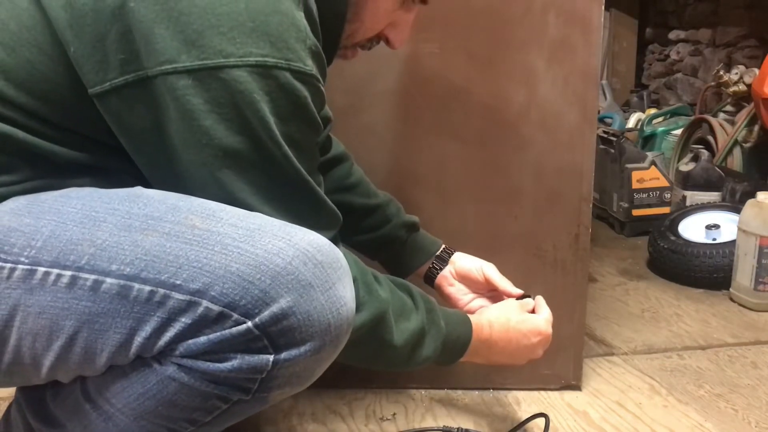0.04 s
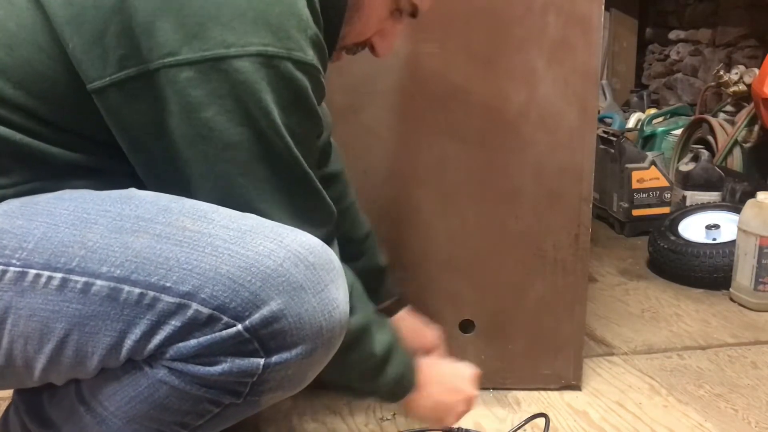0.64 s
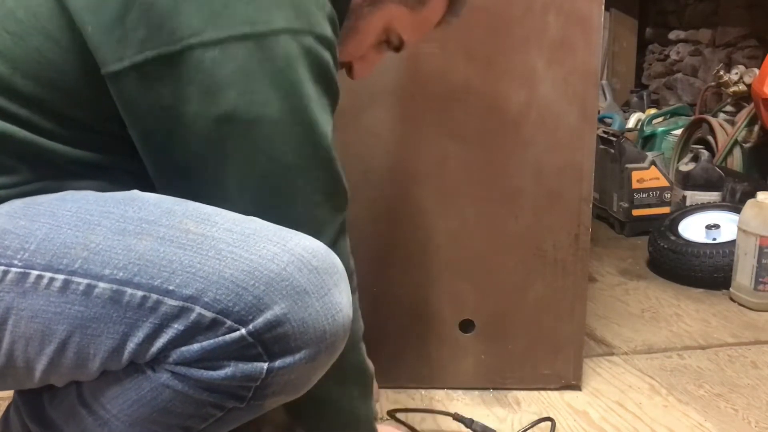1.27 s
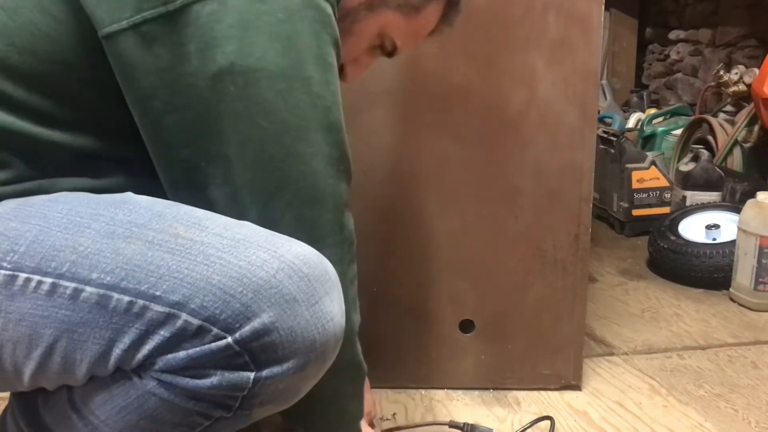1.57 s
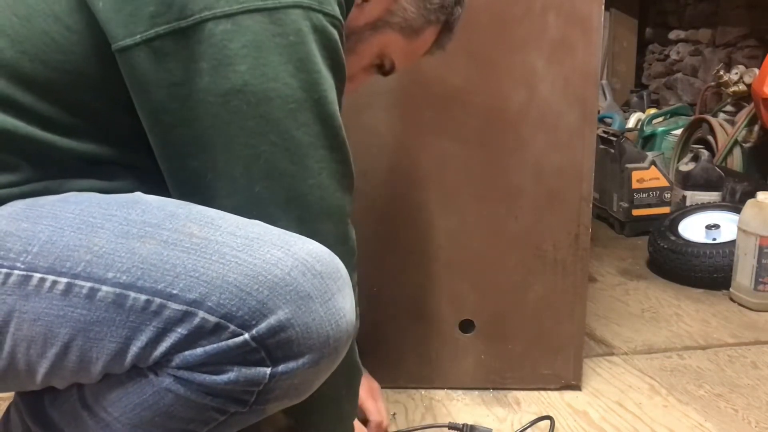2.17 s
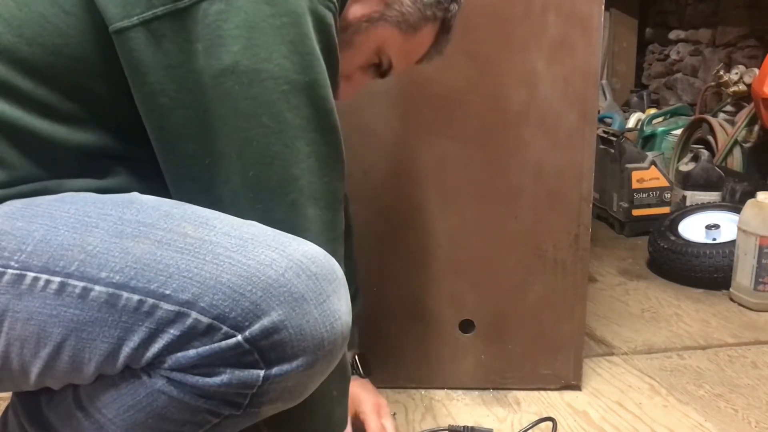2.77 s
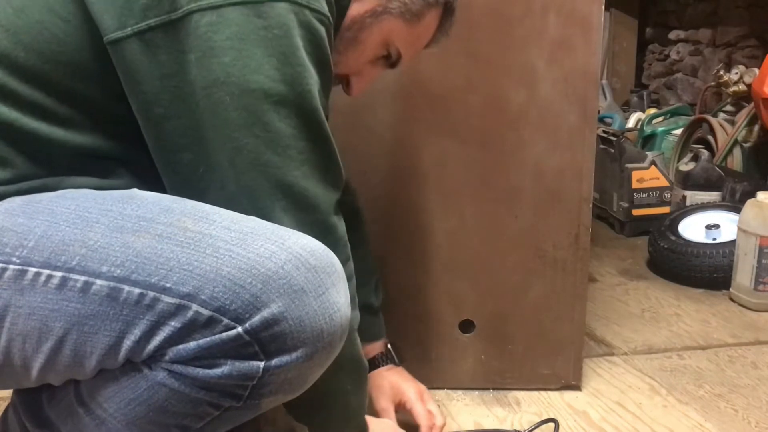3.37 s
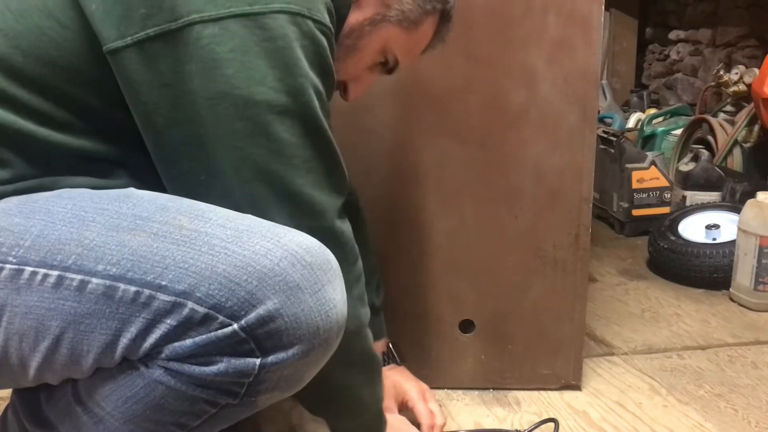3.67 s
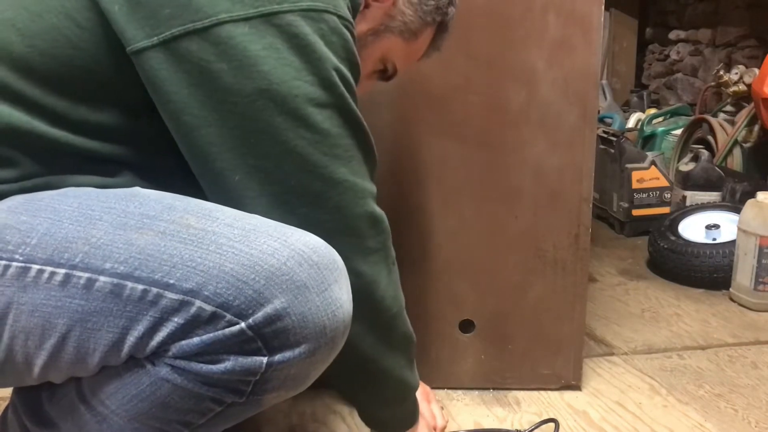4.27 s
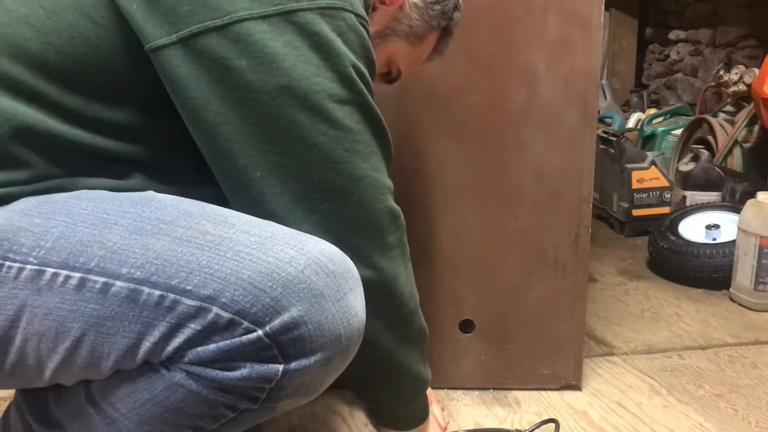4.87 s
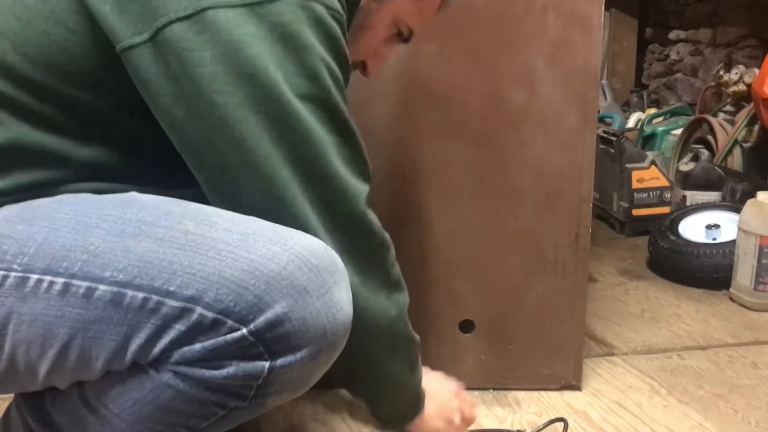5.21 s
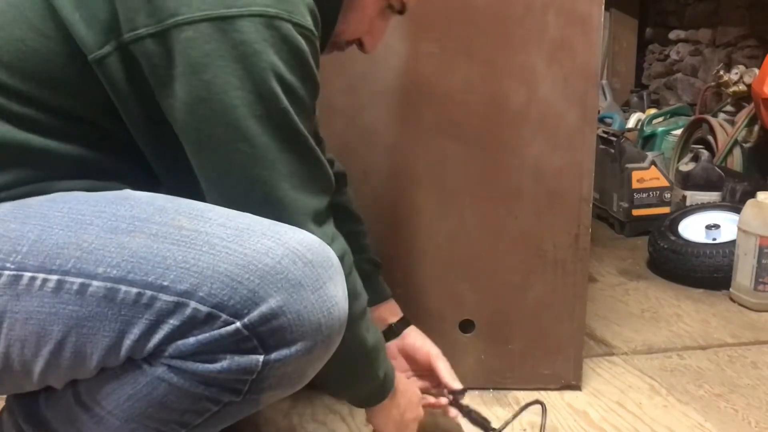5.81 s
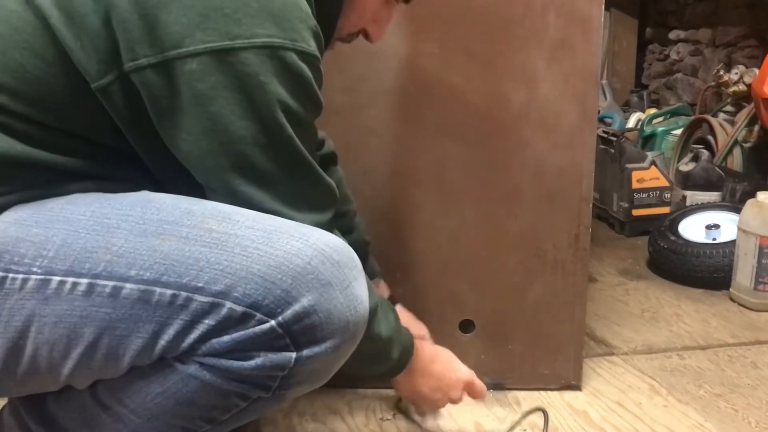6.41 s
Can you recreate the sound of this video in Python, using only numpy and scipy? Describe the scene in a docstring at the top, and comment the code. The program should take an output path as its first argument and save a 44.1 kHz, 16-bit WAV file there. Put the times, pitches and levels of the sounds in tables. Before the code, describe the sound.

A steel hand tool clinks and later scrapes across the floor, amid close rubber rubbing, cord knocks and sleeve rustle.

```python
"""Dull rubbing and soft bumps on the floor, then the clink of a steel hand tool being picked up.
One close microphone in a small workshop, where someone kneels by a steel cabinet and works a rubber
grommet on to a power cord. The rubber sticks and slips, the tool is shoved aside with a gritty,
ringing scrape, and the cord is lifted with a few soft knocks. Sleeves rustle over a low room rumble."""
import sys
import numpy as np
from scipy import signal
from scipy.fft import rfft, irfft
from scipy.io import wavfile
from scipy.ndimage import uniform_filter1d

SR = 44100
rng = np.random.default_rng(int(sys.argv[2]) if len(sys.argv) > 2 else 0)


def unload_audio(sound):
    """Save the sound as a 16-bit wav file, at the path given as the first command line argument."""
    columns = np.transpose(np.atleast_2d(sound))
    # keep every value between -1 and 1, then stretch to whole-number steps
    steps = np.round(np.clip(columns, -1, 1) * 32767)
    wavfile.write(sys.argv[1], SR, steps.astype(np.int16))


N = 284445
TIME = np.arange(N) / SR
AGE = np.arange(SR // 3) / SR  # seconds since a contact


# Steel touches steel, close by: start_s, relative_db, pitch_hz, swell_s, fall_s, focus_db
STEEL_TOUCHES = [(1.1177, -27, 6100, 0.0006, 0.0026, 6.5), (1.12, -14.5, 8400, 0.003, 0.0024, 8),
                 (1.2124, -21.5, 1930, 0.0057, 0.0018, 4), (1.2366, -19.5, 4670, 0.0013, 0.0065, -19),
                 (1.2500, -33, 4840, .001, 0.0057, -9), (1.2602, -16, 7460, 0.0012, 0.0043, -6),
                 (1.268, -24.5, 4400, .001, 0.022, -16), (1.303, -26, 4500, .001, 0.0021, -3),
                 (1.3086, -21, 4330, .0005, 0.0014, 18), (1.589, -23.5, 5000, 0.0068, 0.0048, -19.5)]
# Spectrum of a hard contact: frequency_hz, level_db
CRACK_SPECTRUM = [(400, -15), (1050, -0.5), (1400, -9.5), (1900, -5.5), (2800, -5), (4500, -2), (8000, 2.5),
                  (10200, -6.5), (12500, 1.5), (16000, -10)]
def clinks():
    """Each touch is a short crack, focused round one pitch, and the ring of the steel."""
    out = np.zeros(N)
    for start_s, db, pitch_hz, swell_s, fall_s, focus_db in STEEL_TOUCHES:
        crack = colour(burst(swell_s, fall_s), CRACK_SPECTRUM)
        focus = unit(resonance(crack, pitch_hz, width_hz=900))
        clash = unit(unit(crack) + from_db(focus_db) * focus)
        ring = from_db(-4) * tool_ring(pitch_hz, reach_octaves=0.073)
        add(out, start_s, from_db(db + 13.5) * (clash + ring))
    return out


# Modes of the steel tool: pitch_hz, level_db, t60_s
TOOL_MODES = [(1095, -4, 0.14), (1786, -13, .08), (3000, -17, .05), (4445, 6.5, 0.082), (4620, 1.5, 0.11),
              (5750, -16.5, 0.09), (6060, -5.5, 0.07), (6460, 6, 0.0755), (7280, -3, .06),
              (8220, 6.5, 0.065), (11390, -4, .05), (12500, -14.5, 0.074), (13340, -20.5, .06)]
def tool_ring(pitch_hz, reach_octaves):
    """The modes ring, roughened by the chattering contact; those near pitch_hz are struck hardest."""
    out = 0
    for hz, db, t60_s in TOOL_MODES:
        noise = rng.standard_normal(2 * len(AGE))
        chatter = rms_one(resonance(noise, hz, width_hz=76)[len(AGE):])
        tone = np.sin(2 * np.pi * (hz * AGE + rng.random())) + 0.7 * chatter
        struck = 0.064 + 1 / (1 + (np.log2(hz / pitch_hz) / reach_octaves) ** 2)
        out = out + struck * tone * from_db(db - 60 * AGE / t60_s)
    return unit(out)


def pop(start_s, db, pitch_hz, ring_s):
    """A small hollow pop, one damped tone, starts the last clink."""
    out = np.zeros(N)
    envelope = np.exp(-AGE / ring_s) * (1 - np.exp(-AGE / 0.0012))
    add(out, start_s, from_db(db) * envelope * np.sin(2 * np.pi * pitch_hz * AGE))
    return out


# The tool catches and slips on the floor, levels relative: start_s, crunch_db, fall_s, thump_db
TOOL_SLIPS = [(4.975, -34.5, 0.04, -30.5), (4.9908, -33.5, 0.0098, -33), (5.02, -30, .0046, -19),
              (5.0603, -22, 0.011, -24), (5.0893, -22.5, 0.013, -19), (5.108, -35, .0051, -26),
              (5.1305, -32.5, 0.0057, -19.5), (5.1513, -25.5, 0.0089, -42), (5.176, -34, 0.011, -39),
              (5.204, -36, 0.016, -25), (5.235, -29, 0.0088, -19), (5.247, -33, 0.003, -26.5),
              (5.3088, -29.5, 0.0066, -18.5), (5.3626, -33.5, .024, -16.5), (5.3858, -32.5, 0.0038, -25),
              (5.4246, -35.5, 0.0097, -31)]
# Spectra of the juddering tool and of the grit under it: frequency_hz, level_db
JUDDER_SPECTRUM = [(30, -41.5), (85, 4), (140, 5), (220, 1.5), (400, 0), (720, -1.5), (850, -11.5),
                   (1050, -10), (1300, -21.5), (3000, -49), (10000, -77)]
GRIT_SPECTRUM = [(500, -14), (1300, -8), (1800, 2.5), (2800, 2), (3400, 8), (5300, 2), (6400, 10.5),
                 (7200, 5), (8600, 7.5), (10300, -4), (11800, 4), (13500, 8), (16000, -5)]
def shove():
    """The sliding tool judders on the floor, crunches over grit and rings at every slip."""
    judder, grit = stick_and_slip(start_s=4.97, end_s=5.41)
    slide = judder * friction(per_s=220, spread_db=7)
    floor = from_db(-3) * unit(hollow(slide))
    scrape = from_db(-3.5) * unit(colour(slide, JUDDER_SPECTRUM))
    body = np.linalg.norm(slide) * (floor + scrape)
    grains = friction(per_s=530, spread_db=1.5)
    hiss = from_db(-6.5) * rms_one(colour(grains, GRIT_SPECTRUM))
    singing = sum(from_db(db / 2) * resonance(grains, hz, width_hz=180) for hz, db, _ in TOOL_MODES)
    out = body + grit * (hiss + from_db(-9) * rms_one(singing))
    for start_s, crunch_db, fall_s, thump_db in TOOL_SLIPS:
        add(out, start_s, thud(thump_db, low_hz=225, high_hz=692))
        # every slip catches other grains, so its colour differs
        tint = [(hz, db + rng.normal(0, 1.6)) for hz, db in GRIT_SPECTRUM]
        crushed = crackle(spread_db=3) * burst(swell_s=0.0019, fall_s=fall_s)
        crunch = unit(colour(crushed, tint))
        ring = from_db(-10.5) * tool_ring(3500, reach_octaves=0.65)
        add(out, start_s, from_db(crunch_db + 19) * (crunch + ring))
    return out


def stick_and_slip(start_s, end_s):
    """Strength of judder and grit: an easing push that sticks before each slip and trails grit after."""
    attack_s, release_s, sag_db_per_s = 0.0075, 0.041, 20
    stick_s, stick_db = 0.021, -1.5
    trail_s, trail_db = 0.093, -21.5
    age = np.maximum(TIME - start_s, 0)
    push = np.minimum(age / attack_s, 1) * np.exp(-np.maximum(TIME - end_s, 0) / release_s)
    stuck, grit_power = np.zeros(N), np.zeros(N)
    for slip_s, crunch_db, _, _ in TOOL_SLIPS:
        stuck[(TIME > slip_s - stick_s) & (TIME < slip_s)] = 1
        add(grit_power, slip_s, (from_db(crunch_db + trail_db) * np.exp(-AGE / trail_s)) ** 2)
    moving = from_db(stick_db * uniform_filter1d(stuck, size=220))
    judder = moving * push * from_db(-31.5 - sag_db_per_s * age)
    return judder, moving * np.sqrt(grit_power)


def crackle(spread_db, size=40):
    """Uneven strength of single grains as they are crushed, about a millisecond each."""
    grain_db = spread_db * np.clip(rng.standard_normal(len(AGE) // size + 1), -2, 2)
    return np.repeat(from_db(grain_db), size)[:len(AGE)]


# Soft knocks at floor level: start_s, relative_db, low_hz, high_hz
FLOOR_KNOCKS = [(.877, -37.5, 190, 278), (.907, -39.5, 170, 1230), (.972, -39, 250, 1330),
                (1.047, -30.5, 121, 814), (1.21, -34.5, 99, 450), (1.397, -28.5, 200, 420),
                (1.4287, -31, 319, 1520), (1.626, -35.5, 200, 357), (2.241, -34.5, 139, 920),
                (2.900, -29, 214, 466), (3.171, -37, 280, 880), (4.4113, -43.5, 403, 2160),
                (4.413, -39.5, 90, 340), (4.975, -36, 55, 221), (5.061, -22.5, 800, 2520),
                (5.129, -28.5, 1010, 1880), (5.362, -29.5, 600, 1520), (5.722, -35.5, 343, 1140),
                (5.795, -31, 435, 870), (5.982, -32, 109, 855), (6.127, -41.5, 400, 1940),
                (6.187, -41, 414, 1950), (6.35, -44.5, 404, 1600), (6.39, -37, 70, 746),
                (6.4271, -26.5, 505, 1480), (6.428, -26.5, 74, 251)]
def knocks():
    """Hands, cord and plug bump the floor."""
    out = np.zeros(N)
    for start_s, db, low_hz, high_hz in FLOOR_KNOCKS:
        add(out, start_s, thud(db, low_hz, high_hz))
    return out


def thud(db, low_hz, high_hz):
    """A push and a short shudder of the floor; softer contacts lose more treble."""
    push = signal.unit_impulse(len(AGE)) + 1.86 * burst(swell_s=0.002, fall_s=0.005)
    softness = signal.butter(2, 1.46 * high_hz, fs=SR, output="sos")
    hit = unit(signal.sosfilt(softness, band(push, low_hz, high_hz)))
    return from_db(db + 15) * (hit + from_db(-6) * unit(hollow(hit)))


# The floor and the cabinet beside the work: pitch_hz, width_hz, level_db
HOLLOW_MODES = [(88.5, 12, 17), (172, 40, -3), (231, 16.3, 4), (314, 33, -16), (375.7, 17, 5.5),
                (435.5, 25, -5.5), (579, 46, 0), (636, 37, -13), (740, 16, -4.5), (993, 28.4, -4.5)]
def hollow(x):
    """The low resonances of the floor and cabinet answer a contact, in parallel."""
    return sum(from_db(db) * resonance(x, hz, width_hz) for hz, width_hz, db in HOLLOW_MODES)


# Rubber pushed along the cord and floor: peak_s, rub_db, scuff_db, swell_s, fall_s
RUBBER_PUSHES = [(.66, -68, -72.5, .2, 0.53), (1.0, -48.5, -58, 0.028, 0.033),
                 (1.062, -37.5, -53.5, 0.023, 0.063), (1.47, -61, -79, 0.09, 0.18),
                 (1.85, -66.5, -80, .15, .15), (2.135, -58, -60.5, 0.061, 0.085),
                 (2.31, -60, -69.5, 0.16, 0.39), (2.52, -56.5, -68, 0.037, 0.087),
                 (2.908, -36.5, -56, 0.03, 0.061), (3.01, -50, -68, 0.034, 0.12),
                 (3.19, -44, -62.5, 0.066, 0.061), (3.29, -40.5, -60, 0.042, 0.054),
                 (5.495, -43, -57, 0.042, 0.09), (5.625, -39, -53, 0.035, 0.088),
                 (5.89, -47, -72, 0.057, 0.027), (5.942, -47, -64.5, .02, 0.077),
                 (6.2, -52.5, -62, 0.054, 0.043), (6.43, -50, -62, 0.065, .08)]
# Spectrum of the dull rubbing: frequency_hz, level_db
RUBBER_SPECTRUM = [(45, -23.5), (90, -1), (140, 2.5), (250, 0.5), (360, 0.5), (480, -5.5), (680, -4),
                   (850, -17.5), (1050, -17.5), (1400, -22.5), (2200, -32.5), (8000, -54.5)]
def rubber():
    """Rubber sticks and slips in dull lumps that stir the floor and cabinet."""
    pressure = strokes([(s, db, swell_s, fall_s) for s, db, _, swell_s, fall_s in RUBBER_PUSHES])
    lumps = rms_one(colour(friction(per_s=260, spread_db=3.5), RUBBER_SPECTRUM))
    return pressure * rms_one(lumps + from_db(-10.5) * rms_one(hollow(lumps)))


# Small dry ticks of the cord and plug: start_s, relative_db, pitch_hz
PLUG_TICKS = [(1.53, -46, 3850), (2.17, -44, 2980), (2.349, -39.5, 3580), (2.709, -47.5, 3570),
              (2.926, -37, 3420), (4.404, -47.5, 4460), (4.412, -41, 4300), (4.646, -55, 4280),
              (4.802, -49, 4600), (4.802, -47.5, 1650), (4.893, -33.5, 5340), (5.533, -43, 5070),
              (5.722, -43, 5540), (6.075, -49, 6300)]
def ticks():
    """Hard plastic touches: one broad band and a faint bright crack."""
    out = np.zeros(N)
    for start_s, db, pitch_hz in PLUG_TICKS:
        touch = burst(swell_s=0.00033, fall_s=0.0023)
        body = unit(band(touch, pitch_hz / 1.2, pitch_hz * 1.2))
        crack = from_db(-7.5) * unit(colour(touch, CRACK_SPECTRUM))
        add(out, start_s, from_db(db + 7) * (body + crack))
    return out


# Spectrum of the scuffing cord: frequency_hz, level_db
CORD_SPECTRUM = [(400, -20), (900, 4.5), (1400, -2), (2100, -2), (2400, -2), (2750, -3), (3600, -2.5),
                 (5000, -12.5), (9000, -19)]
def cord_scuff():
    """The cord scuffs with each push of the rubber and each move of an arm."""
    pushes = strokes([(s, db, swell_s, fall_s) for s, _, db, swell_s, fall_s in RUBBER_PUSHES])
    arms = from_db(-3) * strokes(ARM_MOVES)
    scuff = rms_one(colour(friction(per_s=340, spread_db=3), CORD_SPECTRUM))
    return np.hypot(pushes, arms) * scuff


# A sleeve brushes past near the microphone: peak_s, level_db, swell_s, fall_s
ARM_MOVES = [(.75, -74, .17, 0.21), (.92, -64, .012, 0.021), (1.0, -58, 0.018, 0.015),
             (1.09, -54.5, 0.07, 0.2), (1.35, -57, .05, 0.09), (1.52, -67, 0.06, 0.13),
             (1.76, -71, 0.18, .04), (1.93, -67.5, 0.075, 0.065), (2.125, -59, 0.053, 0.04),
             (2.255, -64.5, 0.064, 0.043), (2.47, -70.5, 0.14, 0.15), (2.61, -68.5, 0.1, 0.19),
             (2.885, -59, 0.038, 0.075), (3.1, -63.5, 0.053, 0.053), (3.28, -66.5, 0.13, 0.11),
             (5.48, -76.5, 0.08, 0.091), (5.64, -60, 0.12, 0.043), (5.95, -65.5, 0.4, 0.25),
             (6.23, -69.5, 0.086, 0.074), (6.44, -63.5, 0.08, 0.081)]
# Spectrum of the cloth: frequency_hz, level_db
CLOTH_SPECTRUM = [(1000, -23), (2500, -18), (4000, 0), (6000, 3), (8500, 1.5), (10400, -2), (13000, 1),
                  (16000, -3.5)]
def sleeves():
    """Cloth brushes finely over cloth as an arm moves."""
    return strokes(ARM_MOVES) * rms_one(colour(friction(per_s=800, spread_db=3), CLOTH_SPECTRUM))


# Reverberation of the small workshop: frequency_hz, t60_s
WORKSHOP_DECAY = [(100, 0.74), (500, 0.21), (2000, 0.345), (5000, 0.22), (14000, 0.065)]
def workshop(x, near_db, tail_db):
    """Direct sound, quick reflections off floor and cabinet, then a tail that dies band by band."""
    age = np.arange(SR // 2) / SR
    edges_hz = np.geomspace(45, 18000, 9)
    tail = 0
    for low_hz, high_hz in zip(edges_hz, edges_hz[1:]):
        t60_s = at_hz(WORKSHOP_DECAY, np.sqrt(low_hz * high_hz))
        tail = tail + band(rng.standard_normal(len(age)), low_hz, high_hz) * from_db(-60 * age / t60_s)
    tail = from_db(tail_db) * unit(tail * np.minimum(age / 0.0058, 1))
    near = from_db(near_db) * burst(swell_s=0.0046, fall_s=0.0062)
    return x + signal.oaconvolve(x, near)[:N] + signal.oaconvolve(x, tail)[:N]


# Spectrum of the steady background as the close microphone hears it: frequency_hz, level_db
AIR_SPECTRUM = [(15, -41), (25, -27.5), (45, -15.5), (74, -6.5), (103, -13.5), (165, -19), (230, -23),
                (400, -27.5), (800, -34.5), (2000, -41.5), (6000, -47), (10400, -49.5), (13000, -46),
                (16000, -52)]
# The rumble comes up in the first second, then eases: time_s, level_db
RUMBLE_LEVELS = [(0, -92), (.9, -57.5), (6.45, -64)]
def room_tone(rumble_hz):
    """Faint steady hiss and a low, wavering rumble."""
    air = from_db(-60.5) * rms_one(colour(rng.standard_normal(N), AIR_SPECTRUM))
    level = from_db(np.interp(TIME, *np.transpose(RUMBLE_LEVELS)))
    rumble = rms_one(band(rng.standard_normal(N), rumble_hz - 9, rumble_hz + 9))
    return air + level * rumble


def strokes(rows, roundness=1.37):
    """Strokes swell and fall, adding in power; roundness 1 is pointed, 2 bell-shaped."""
    power = np.zeros(N)
    for peak_s, db, swell_s, fall_s in rows:
        span = slice(*np.searchsorted(TIME, [peak_s - 4 * swell_s, peak_s + 4 * fall_s]))
        away = np.maximum((peak_s - TIME[span]) / swell_s, (TIME[span] - peak_s) / fall_s)
        power[span] += (from_db(db) * np.exp(-away ** roundness)) ** 2
    return np.sqrt(power)


def friction(per_s, spread_db):
    """Noise whose strength jumps from one tiny contact to the next."""
    contact = np.cumsum(rng.random(N) < per_s / SR)
    strength = from_db(spread_db * np.clip(rng.standard_normal(N), -2, 2))
    return rms_one(rng.standard_normal(N) * strength[contact])


def burst(swell_s, fall_s):
    """A flurry of micro-impacts that swells and dies away."""
    envelope = np.minimum(AGE / swell_s, 1) * np.exp(-np.maximum(AGE - swell_s, 0) / fall_s)
    return unit(rng.standard_normal(len(AGE)) * envelope)


def resonance(x, hz, width_hz):
    """One resonance, gain 1 at its peak."""
    radius = np.exp(-np.pi * width_hz / SR)
    feedback = [1, -2 * radius * np.cos(2 * np.pi * hz / SR), radius ** 2]
    return signal.lfilter(np.array([1, 0, -1]) * (1 - radius ** 2) / 2, feedback, x + 1e-18)


def band(x, low_hz, high_hz):
    """Band-pass."""
    return signal.sosfilt(signal.butter(2, [low_hz, high_hz], "band", fs=SR, output="sos"), x + 1e-18)


def colour(x, spectrum, size=4096):
    """Causal (minimum-phase) filter with the given spectrum."""
    gain = from_db(at_hz(spectrum, np.linspace(0, SR / 2, size + 1)))
    cepstrum = irfft(np.log(gain))
    cepstrum[1:size] *= 2
    cepstrum[size + 1:] = 0
    return signal.oaconvolve(x, irfft(np.exp(rfft(cepstrum))))[:len(x)]


def at_hz(points, hz):
    """Read a table on a log-frequency axis."""
    table_hz, values = np.transpose(points)
    return np.interp(np.log(hz + 1e-9), np.log(table_hz), values)


def from_db(db):
    """Decibels to gain."""
    return 10 ** (np.asarray(db) / 20)


def rms_one(x):
    """Scale to rms 1."""
    return x / np.sqrt(np.mean(x ** 2) + 1e-20)


def unit(x):
    """Scale to energy 1."""
    return x / np.sqrt(np.sum(x ** 2) + 1e-20)


def add(out, start_s, sound):
    """Mix a sound in from start_s."""
    start = int(start_s * SR)
    out[start:start + len(sound)] += sound[:N - start]


def scene():
    """The work on the floor and the room around it, at one close microphone."""
    work = rubber() + cord_scuff() + sleeves() + shove() + knocks() + clinks() + ticks()
    work += pop(start_s=1.588, db=-30, pitch_hz=971, ring_s=0.0089)
    return (workshop(work, near_db=-12.5, tail_db=-11.5) + room_tone(rumble_hz=71.3))[None]


def record(dry):
    """The treble is cut steeply above 16 kHz."""
    return signal.sosfilt(signal.ellip(12, .1, 80, 16000, fs=SR, output="sos"), dry)


dry = scene()
out = record(dry)
unload_audio(out)
```